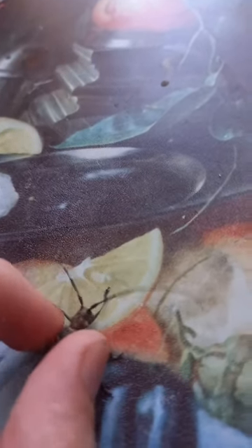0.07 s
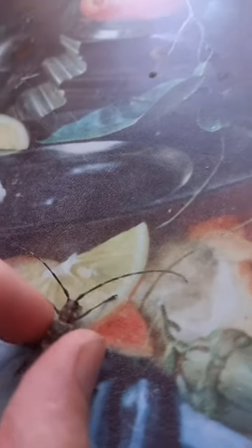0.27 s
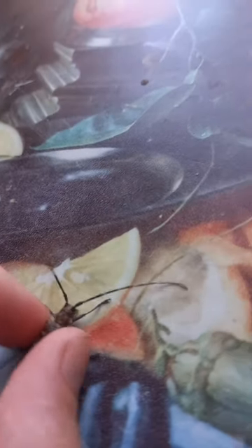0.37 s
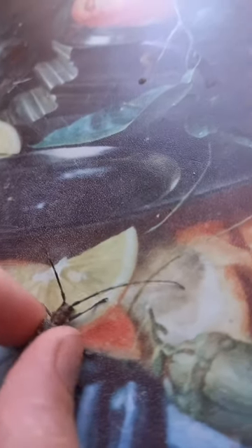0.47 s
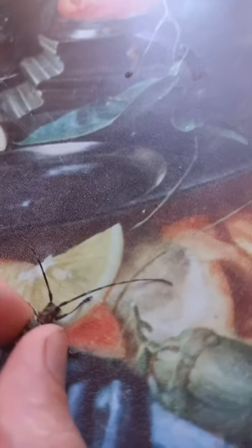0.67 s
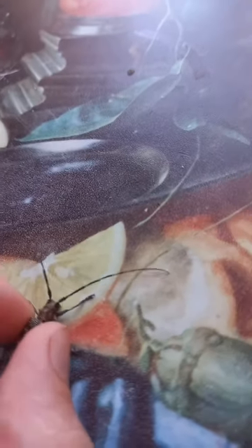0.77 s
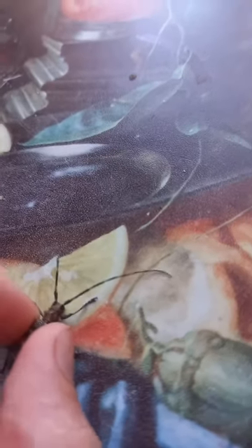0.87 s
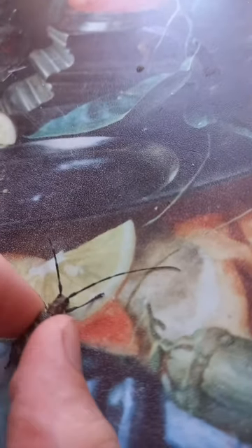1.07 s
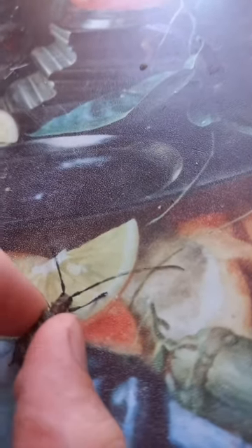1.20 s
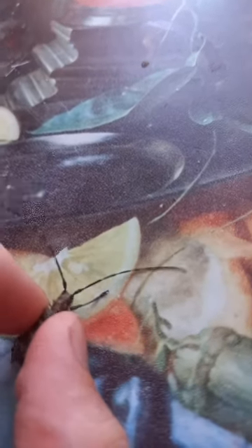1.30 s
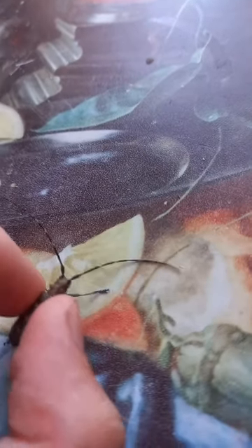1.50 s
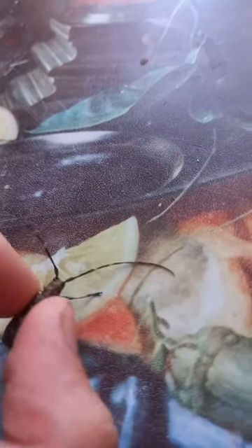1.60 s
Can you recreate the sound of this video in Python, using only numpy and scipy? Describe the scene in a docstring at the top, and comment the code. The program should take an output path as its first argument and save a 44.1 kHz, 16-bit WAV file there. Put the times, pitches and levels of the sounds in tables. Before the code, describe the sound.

A held longhorn beetle gives short raspy squeaks and dry ticking rasps close by, fingers faintly rustling

```python
"""In a small, low-humming room, a longhorn beetle held between finger and thumb squeaks close to the left microphone.
It draws a scraper over a ridged file on its thorax, and every ridge gives one click in the shell.
Fast strokes fuse the clicks into squeaks; slow ones rasp and break up into single ticks.
Shaped noise makes the finger rustle, soft bumps, thin hiss and room hum; swelling low sines make the hand thuds."""
import sys
import numpy as np
from scipy import signal
from scipy.fft import rfft, irfft, next_fast_len
from scipy.io import wavfile
from scipy.ndimage import uniform_filter1d, map_coordinates

SR = 44100
rng = np.random.default_rng(int(sys.argv[2]) if len(sys.argv) > 2 else 0)


def wrap_up_sound(samples):
    """Save the sound to the file named by the first command line argument, as 16-bit audio."""
    columns = np.atleast_2d(samples).T
    # keep every value between -1 and 1, then stretch to whole-number steps
    tamed = np.clip(columns, -1, 1)
    steps = np.round(tamed * 32767).astype(np.int16)
    wavfile.write(sys.argv[1], SR, steps)


N = 72765
T = np.arange(N) / SR
UNSTEADY_S = 0.0017   # time constant of the flicker in strokes and rustle


def from_db(db):
    """Decibels to gain."""
    return 10 ** (np.asarray(db) / 20)


def coloured(x, points):
    """Causal minimum-phase filter with the given (freq_hz, level_db) response."""
    size = next_fast_len(2 * N) // 2 * 2
    hz, db = np.transpose(points)
    grid = np.maximum(np.arange(size // 2 + 1) * SR / size, 1)
    response_db = np.interp(np.log(grid), np.log(hz), db)
    # folding the cepstrum onto positive time gives minimum phase
    fold = irfft(np.log(from_db(response_db)))
    fold[1:size // 2] *= 2
    fold[size // 2 + 1:] = 0
    return irfft(rfft(x, size) * np.exp(rfft(fold)))[..., :N]


def noise(points):
    """Coloured noise, unrelated in the two channels; rms 1."""
    x = coloured(rng.standard_normal((2, N)), points)
    return x / x.std()


def waver(seconds):
    """Smooth random drift: noise through two equal one-pole lowpasses of this time constant; spread 1."""
    r = np.exp(-1 / (seconds * SR))
    x = signal.lfilter([1], [1, -2 * r, r * r], rng.standard_normal(2 * N))[N:]
    return x / x.std()


def clicks(times, gains, size=8):
    """Band-limited clicks: windowed sincs placed between the samples."""
    out = np.zeros(N)
    at = np.asarray(times)[:, None] * SR
    taps = at.astype(int) + np.arange(-size, size + 1)
    shape = np.sinc(taps - at) * np.sinc((taps - at) / (size + 1))
    np.add.at(out, np.clip(taps, 0, N - 1), gains[:, None] * shape)
    return out


def struck(x, points):
    """Clicks through a ringing body, scaled so that a unit click peaks at 1."""
    return coloured(x, points) / np.abs(coloured(np.ones(1), points)).max()


def swells(rows):
    """Rounded rises of level with steep flanks, at half their height half_s from the middle."""
    return sum(from_db(db) / (1 + ((T - s) / half_s) ** 6) for s, half_s, db in rows)


# hum and hiss of the room: freq_hz [Hz], level_db [dB, relative]
FLOOR_COLOUR = [(25, -39), (40, -27), (60, -9.5), (82, 0), (110, -7), (180, -15), (300, -15), (700, -24),
                (1500, -36), (3500, -41.5), (6500, -44.5), (7800, -55), (14000, -42.5), (15400, -30),
                (16000, -32.5)]


def room_hum():
    """Steady noise, strongest near 82 Hz, lies low behind the beetle."""
    return from_db(-62.5) * noise(FLOOR_COLOUR) * from_db([[1.2], [-1.2]])


# how the rustle rises and falls: time_s [s], level_db [dB, before grain and balance]
RUSTLE_LEVEL = [(0, -73), (.07, -44), (.16, -59), (.3, -49), (.6, -56), (.92, -67.5), (1.2, -55.5),
                (1.35, -64.5), (1.41, -64), (1.54, -62.5), (1.6, -62.5), (1.65, -62)]
# its colour: freq_hz [Hz], level_db [dB, relative]
RUSTLE_COLOUR = [(700, -34.5), (1200, -13.5), (1700, -0.5), (2400, 0.5), (2800, -7.5), (3200, -21.5),
                 (5000, -15), (6400, -10.5), (7000, -26.5), (7600, -48.5)]
RUSTLE_GRAIN_DB = 1   # spread of its flicker


def rustle():
    """Skin and legs rub: coloured noise follows a level curve with a fine random grain."""
    level_db = np.interp(T, *np.transpose(RUSTLE_LEVEL))
    grain_db = RUSTLE_GRAIN_DB * waver(UNSTEADY_S)
    return from_db(level_db + grain_db) * noise(RUSTLE_COLOUR) * from_db([[2], [-2]])


WOBBLE, FLUTTER_DB = .014, 1.5   # spread of the stroke's speed (as a share) and of its force


def stroke(rows, jitter, spread_db, friction_db):
    """One pass over the file: a click per ridge, friction between them, and a pure tone at the ridge rate."""
    s, hz, db = np.transpose(rows)
    s = np.sort(s)
    rate = np.interp(T, s, hz) * (1 + WOBBLE * waver(UNSTEADY_S))
    force = from_db(np.interp(T, s, db) + FLUTTER_DB * waver(UNSTEADY_S))
    touching = (T >= s[0]) & (T <= s[-1])
    # a ridge clicks each time the count of ridges passed reaches a whole number
    passed = np.cumsum(rate * touching) / SR
    ridges = np.arange(int(passed[-1]) + 1)
    slip, height = rng.standard_normal((2, 512))[:, ridges]
    times = np.interp(ridges, passed[touching], T[touching])
    times = times + jitter * slip / np.interp(times, s, hz)
    train = clicks(times, np.interp(times, T, force) * from_db(spread_db * height))
    rubbing = np.sqrt(rate / SR) * rng.standard_normal(N)
    friction = from_db(friction_db) * force * touching * rubbing
    fade = uniform_filter1d(touching * 1., size=64)
    # 2 * rate / SR is the strength of the fundamental of an even click train
    tone = force * fade * np.cos(2 * np.pi * passed) * 2 * rate / SR
    return train + friction, tone


# fast strokes, one list each, as breakpoints before speed and force waver:
# time_s [s], ridge_rate_hz [ridges per s], level_db [dB per click, relative]
SQUEAKS = [
    [(.001, 2100, -54), (.012, 1900, -67), (.02, 1600, -54.5), (.03, 2530, -54)],
    [(.189, 1630, -55.5), (.2, 1790, -44.5), (.21, 1860, -45.5), (.224, 1650, -47)],
    [(.226, 2160, -20.5), (.232, 1910, -24.5), (.24, 2080, -22), (.244, 1540, -31.5), (.249, 1130, -15.5),
     (.255, 870, -18), (.262, 560, -12.5)],
    [(.277, 2340, -38.5), (.283, 1950, -21), (.287, 1700, -29.5), (.294, 2080, -21), (.301, 2010, -26),
     (.308, 930, -19)],
    [(.379, 1160, -19.5), (.385, 1890, -20), (.393, 1975, -18.5), (.398, 2000, -17), (.408, 2030, -17),
     (.421, 2053, -21), (.428, 1640, -19), (.433, 840, -22), (.44, 660, -22.5), (.446, 580, -26)],
    [(.679, 1100, -27), (.686, 1450, -37), (.695, 1680, -39), (.71, 1730, -40), (.722, 1750, -43),
     (.733, 1200, -49), (.762, 1100, -52)],
    [(1.037, 1000, -22), (1.043, 1350, -21), (1.052, 1620, -24), (1.065, 1670, -26), (1.073, 1680, -37),
     (1.09, 1680, -39), (1.104, 1420, -49)],
    [(1.262, 770, -71), (1.275, 1670, -46), (1.292, 1625, -39.5), (1.32, 1735, -44), (1.338, 1320, -50)],
    [(1.36, 2680, -78), (1.378, 2970, -65), (1.385, 2500, -47.5), (1.395, 2040, -61), (1.408, 1010, -43.5),
     (1.428, 1100, -55.5)],
    [(1.433, 1000, -38.5), (1.445, 1780, -45.5), (1.46, 1680, -38), (1.482, 1790, -47), (1.5, 1930, -54.5)],
]
# contact in each squeak, same order: tone_db [dB against the clicks' fundamental], treble_db [dB],
# jitter [share of the ridge spacing], friction_db [dB]
CONTACTS = [(-15, 14, 0.02, -6.5), (-20, 13.5, 0.014, -9.5), (-32, -2.5, 0.053, -24.5),
            (-9, -16, 0.029, -10.5), (-12, 8.5, 0.021, -24), (-8.5, 4.5, 0.034, -11), (-20, 5, 0.0094, -24),
            (3.5, -0.5, 0.046, -18), (-18, 1, 0.12, -25), (-12, -0.5, 0.017, -7)]
TREBLE_HZ, SQUEAK_SPREAD_DB = 3200, 1.28   # treble split; spread of click level from ridge to ridge


def squeaks():
    """Fast strokes fuse into pitch; each contact sets the clicks' treble and adds a pure fundamental."""
    lowpass = signal.butter(2, TREBLE_HZ, fs=SR, output="sos")
    out = 0
    for rows, (tone_db, treble_db, jitter, friction_db) in zip(SQUEAKS, CONTACTS):
        train, tone = stroke(rows, jitter, SQUEAK_SPREAD_DB, friction_db)
        low = signal.sosfiltfilt(lowpass, train + 1e-18)
        treble = train - low
        out = out + low + from_db(treble_db) * treble + from_db(tone_db) * tone
    return out


# colour of the reflections: freq_hz [Hz], level_db [dB, relative]
ROOM_COLOUR = [(900, -8.5), (1500, 3.5), (2300, -2), (3300, 3), (4800, -2), (6400, 0.5)]
ROOM_DB, ROOM_T60_S, ROOM_DELAY_S = -12, 0.16, 0.0018


def room(x):
    """Short diffuse tail: decaying coloured noise, different at each microphone."""
    decay = from_db(-60 * T / ROOM_T60_S) * (T > ROOM_DELAY_S)
    tail = coloured(rng.standard_normal((2, N)) * decay, ROOM_COLOUR)
    tail /= np.sqrt((tail ** 2).sum(axis=1, keepdims=True))
    return from_db(ROOM_DB) * signal.fftconvolve(x[None], tail, axes=1)[:, :N]


# slow strokes, one list each, as breakpoints before speed and force waver:
# time_s [s], ridge_rate_hz [ridges per s], level_db [dB per click, relative]
RASPS = [
    [(.034, 413, -59), (.052, 730, -29.5), (.06, 477, -31.5), (.067, 820, -39), (.075, 500, -41),
     (.09, 500, -35), (.11, 430, -53.5), (.135, 400, -39)],
    [(.308, 1300, -40), (.325, 1170, -22.5), (.335, 1310, -23.5), (.345, 470, -20.5), (.356, 564, -20.5),
     (.366, 560, -24), (.371, 570, -22.5)],
    [(.4635, 1590, -25), (.472, 1285, -26.5), (.48, 1300, -24.5), (.489, 703, -27.5), (.502, 760, -28.5),
     (.515, 475, -25.5), (.535, 476, -29), (.548, 370, -25), (.565, 384, -25)],
    [(.77, 730, -29.5), (.78, 410, -36), (.788, 313, -33.5), (.803, 280, -32.5), (.817, 550, -29.5),
     (.833, 1100, -31.5), (.841, 550, -27.5), (.848, 780, -33), (.862, 340, -28), (.872, 350, -30),
     (.887, 280, -36.5)],
    [(.96, 220, -43.5), (.972, 350, -29), (.985, 610, -30.5), (1.002, 810, -26), (1.011, 420, -30),
     (1.021, 390, -31.5)],
    [(1.148, 388, -31), (1.165, 245, -29), (1.177, 504, -32.5), (1.187, 490, -25.5), (1.21, 493, -26.5),
     (1.225, 844, -25), (1.24, 965, -23.5), (1.248, 495, -30.5), (1.256, 340, -36.5)],
]
RASP_JITTER, RASP_SPREAD_DB = .055, 1.14   # share of the ridge spacing; level spread from ridge to ridge
RASP_FRICTION_DB = -24.5   # rubbing between ridges


def rasps():
    """Slow strokes: ridge clicks come far enough apart to be heard as a rough, nearly regular rasp."""
    return sum(stroke(rows, RASP_JITTER, RASP_SPREAD_DB, RASP_FRICTION_DB)[0] for rows in RASPS)


# legs tapping against the fingers: time_s [s], level_db [dB, relative]
TAPS = [(0.1169, -41), (0.1197, -31.5), (0.17, -37)]
# ring of a tap: freq_hz [Hz], level_db [dB, relative]
TAP_COLOUR = [(200, -17), (900, -13), (1800, 0.5), (3000, -17), (4000, 5), (5000, -5.5), (6200, -14),
              (7000, -27), (7700, -52)]


def taps():
    """The legs tap the fingers: single clicks with a brighter ring than the shell."""
    tap_s, tap_db = np.transpose(TAPS)
    return struck(clicks(tap_s, from_db(tap_db)), TAP_COLOUR)


# soft bumps of the fingers: middle_s [s], half_length_s [s], level_db [dB, before balance]
BUMPS = [(.152, 0.02, -50), (.18, 0.015, -47), (.23, 0.037, -53.5)]
# their colour: freq_hz [Hz], level_db [dB, relative]
BUMP_COLOUR = [(30, -17), (80, -2), (140, -0.5), (250, -6.5), (500, -18), (900, -25), (3000, -66.5)]


def bumps():
    """The fingers bump softly: low noise swells, stronger on the right."""
    return swells(BUMPS) * noise(BUMP_COLOUR) * from_db([[-4], [4]])


# shifts of the hand: time_s [s], level_db [dB, top of the envelope]
THUDS = [(0.147, -50), (.27, -46), (0.379, -49.5), (0.769, -49.5), (1.206, -53.5), (1.41, -56),
         (1.489, -51.5)]
THUD_HZ, THUD_RISE_S = 81.8, 0.013


def thuds():
    """Each shift of the hand sets a low resonance swelling and dying."""
    out = 0
    for s, db in THUDS:
        age = np.maximum(T - s, 0)
        envelope = age / THUD_RISE_S * np.exp(1 - age / THUD_RISE_S)
        turns = THUD_HZ * age + rng.random((2, 1)) / 2   # chance phase in each channel
        out = out + from_db(db) * envelope * np.sin(2 * np.pi * turns)
    return out


# thin high hiss: middle_s [s], half_length_s [s], level_db [dB, before balance]
SIZZLES = [(.412, 0.022, -47), (.70, 0.023, -57), (1.058, .017, -52.5), (1.288, 0.022, -51),
           (1.458, 0.019, -52.5)]
# its colour: freq_hz [Hz], level_db [dB, relative]
SIZZLE_COLOUR = [(4000, -20.5), (5600, -8.5), (6500, 13.5), (7100, -3.5), (7700, -24), (9200, -22),
                 (10000, -3.5), (11000, -14), (12200, -6.5), (14000, -11), (15400, 1.5), (16000, -18)]


def sizzle():
    """Narrow bands of high noise swell with some squeaks, mostly on the left."""
    return swells(SIZZLES) * noise(SIZZLE_COLOUR) * from_db([[3], [-17]])


# the scraper slips over a single ridge: time_s [s], level_db [dB, relative]
TICKS = [(0.4639, -26.5), (0.568, -29.5), (0.5731, -30.5), (0.594, -28.5), (0.5995, -29.5), (0.6082, -28),
         (0.6147, -30), (0.619, -26), (0.6224, -26), (0.6256, -26), (0.6306, -31), (0.6355, -23.5),
         (0.6407, -29), (0.6489, -26), (0.6787, -21.5), (0.767, -27), (0.8928, -33), (0.9364, -43),
         (0.9499, -38), (0.9608, -39), (1.0378, -19.5), (1.1453, -25.5)]
TICK_DB, TICK_LOW_CUT_HZ = 3, 1840   # gain on all ticks; their highpass


def ticks():
    """Single ridge clicks, thin and light in the low end."""
    tick_s, tick_db = np.transpose(TICKS)
    highpass = signal.butter(4, TICK_LOW_CUT_HZ, "high", fs=SR, output="sos")
    return signal.sosfilt(highpass, clicks(tick_s, from_db(tick_db + TICK_DB)) + 1e-18)


# what the shell rings with: freq_hz [Hz], level_db [dB, relative]
SHELL = [(300, -50.5), (950, -32.5), (1250, -17.5), (1550, -6.5), (2000, -1.5), (2450, 2.5), (2850, -4.5),
         (3300, -12), (4200, -8.5), (5100, -15), (5900, -17), (6700, -22.5), (7150, -35), (7700, -91),
         (16000, -72.5)]


def beetle():
    """Squeaks, rasps and ticks all ring the same shell; the leg taps ring apart from it."""
    slow = rasps()
    fast = squeaks()
    return struck(fast + slow + ticks(), SHELL) + taps()


# the right microphone against the left: freq_hz [Hz], level_db [dB]
RIGHT_COLOUR = [(1000, -7.5), (1500, -11), (2000, -12.5), (2450, -13), (3200, -12.5), (4200, -7.5),
                (5300, -4), (6100, -1), (7000, -6)]
RIGHT_LAG_S = 0.0002632


def right_microphone(left):
    """The direct sound arrives later, recoloured and with opposite sign."""
    late = map_coordinates(left, [(T - RIGHT_LAG_S) * SR], order=3)
    return -coloured(late, RIGHT_COLOUR)


def scene():
    """The beetle close to the left microphone, the fingers and the room."""
    left = from_db(3.0) * beetle()
    direct = np.array([left, right_microphone(left)])
    hiss = sizzle()
    fingers = bumps() + rustle()
    hum = room_hum()
    reflections = room(left) * from_db([[0], [-4]])
    return direct + reflections + hiss + fingers + thuds() + hum


CUTOFF_HZ = 15650


def record(dry):
    """A steep elliptic lowpass cuts the top."""
    return signal.sosfilt(signal.ellip(10, .2, 80, CUTOFF_HZ, fs=SR, output="sos"), dry)


dry = scene()
out = record(dry)
wrap_up_sound(out)
```